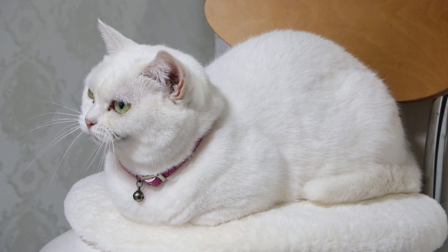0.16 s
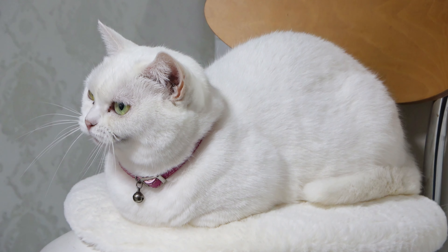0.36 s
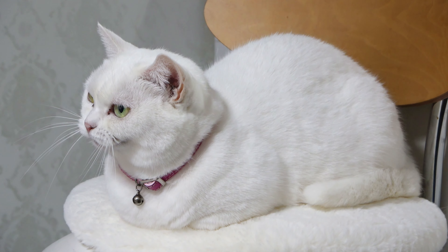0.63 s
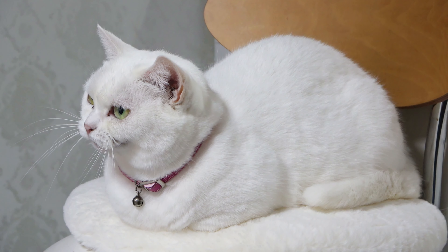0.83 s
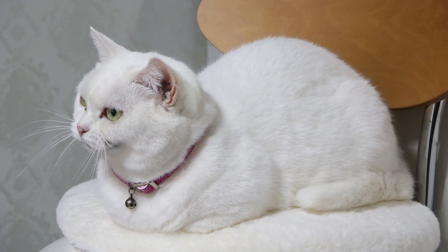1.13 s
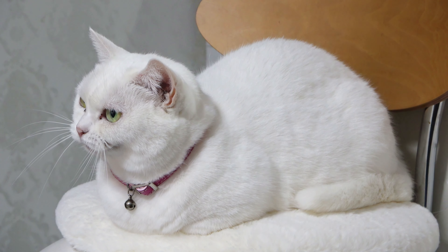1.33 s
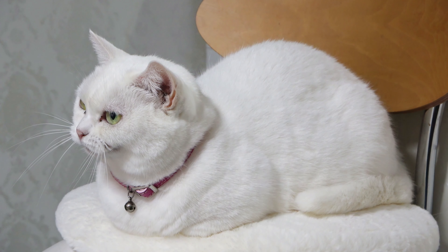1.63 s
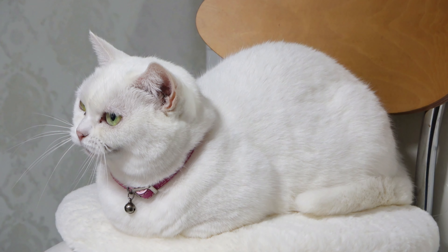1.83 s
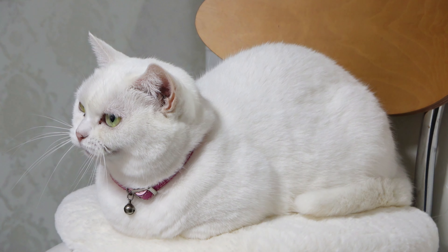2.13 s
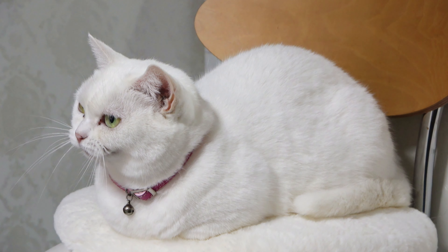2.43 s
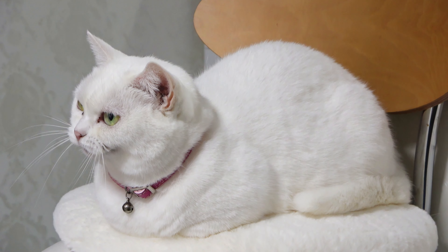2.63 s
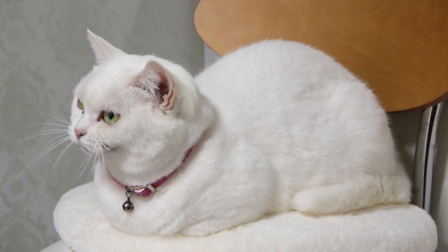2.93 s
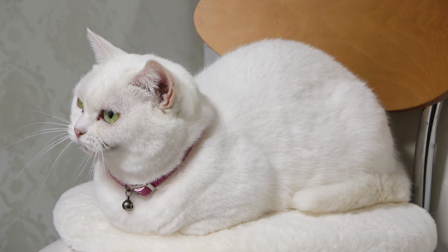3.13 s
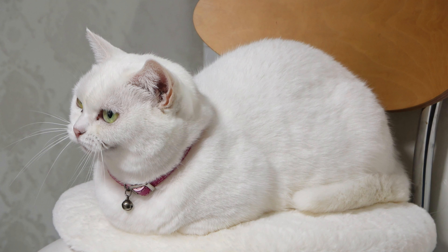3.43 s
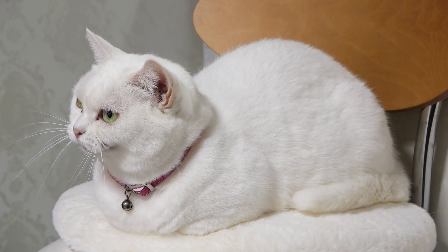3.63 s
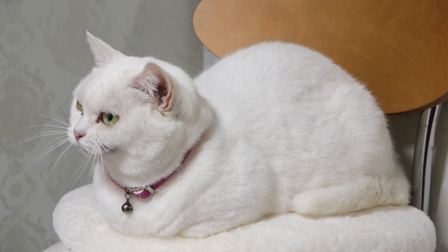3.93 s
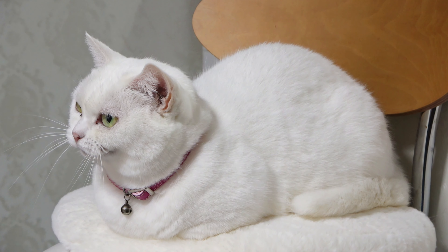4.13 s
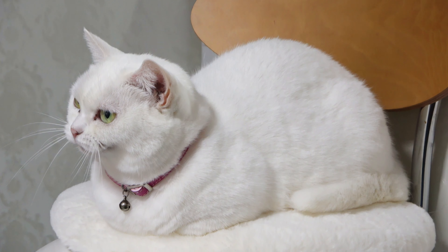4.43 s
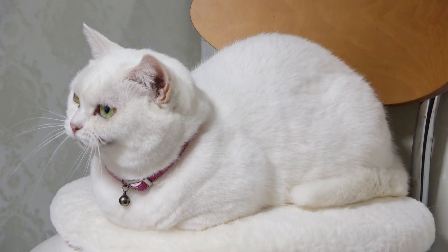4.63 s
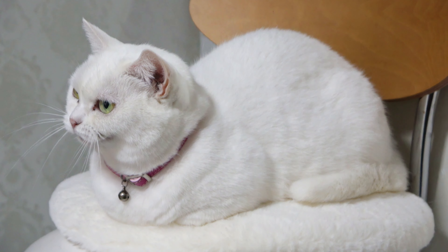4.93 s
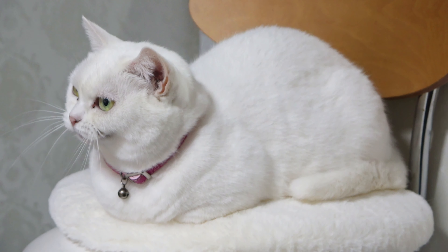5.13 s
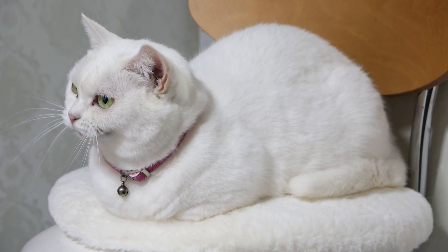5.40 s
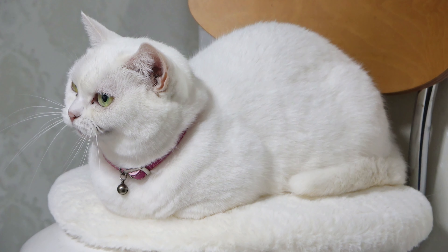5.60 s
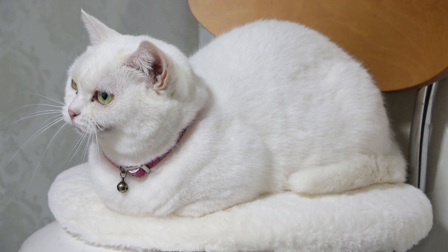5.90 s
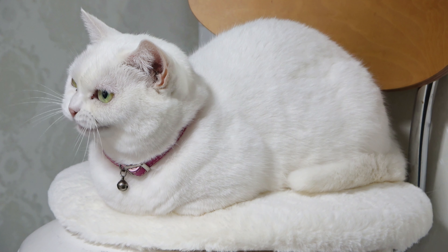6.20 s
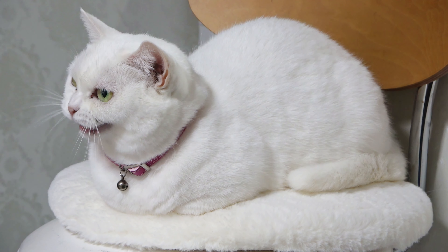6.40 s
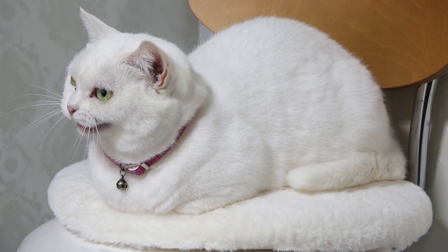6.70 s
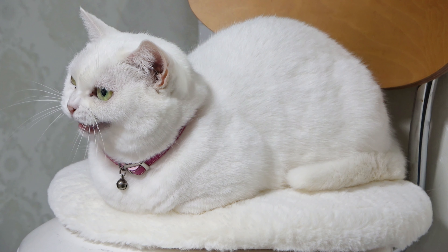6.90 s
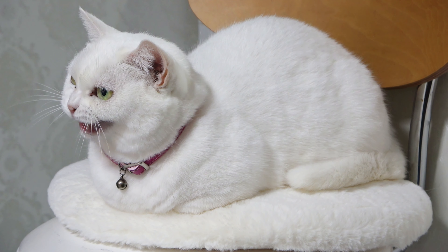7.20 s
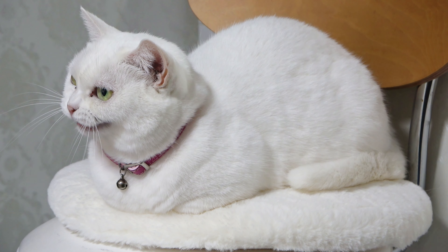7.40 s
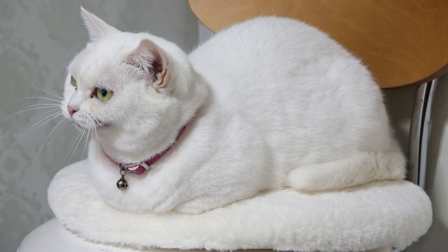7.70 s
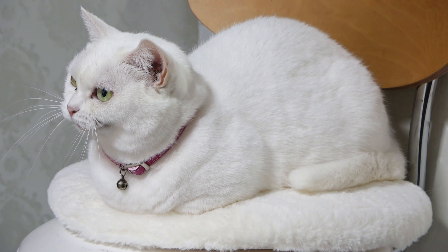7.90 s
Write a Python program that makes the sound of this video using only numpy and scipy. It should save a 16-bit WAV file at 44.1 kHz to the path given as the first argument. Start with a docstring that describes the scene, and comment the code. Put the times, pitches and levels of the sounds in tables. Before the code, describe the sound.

A close microphone in a small quiet room at home picks up steady low hum, soft hiss and a deep floor sway. Someone nearby moves about: muffled boards thump, cloth rustles briefly, and small hollow knocks join in, busiest in the middle. The thumps thin out, then a cat chatters nearby with crisp jaw clicks and two very short rough mews, more clicks following irregularly. One faint thump ends it.

```python
"""Throughout, the hum of the house, microphone hiss and a thin high whine lie under a low floor sway.
From the start someone moves about nearby: thumps ring the boards' modes, a few bursts of noise rustle,
then hollow knocks join in, each a noisy crack and a set of ringing modes.
Late on, a cat chatters: jaw snaps (short clicks with a mouth ring), then two short rough mews, each with a
throat pop at its start (fold pulses and breath through resonances), then snaps; a faint thump ends it."""
import sys
import numpy as np
from scipy import signal
from scipy.io import wavfile
from scipy.ndimage import uniform_filter1d

SR = 44100
rng = np.random.default_rng(int(sys.argv[2]) if len(sys.argv) > 2 else 0)


def inscribe(sig):
    """Save sig as 16-bit PCM at rate SR to the path in sys.argv[1].

    A 1-D sig is mono; a 2-D sig holds one channel per row.
    Samples are clipped to [-1, 1] before scaling.
    """
    pcm = np.round(np.clip(np.atleast_2d(sig).T, -1, 1) * 32767)
    wavfile.write(sys.argv[1], SR, pcm.astype(np.int16))


N = 355093  # length in samples

# Broad colour of the steady bed. Each row: frequency in Hz, relative level in dB.
HUM_COLOUR = [(12, -37), (20, 8), (70, -4), (106, -3), (202, -10.5), (290, -9), (315, -16), (453, -15),
              (492, -20), (747, -18.5), (2150, -28), (2690, -28), (3090, -28), (15600, -33.5)]
# Resonances of the hum. Each row: centre in Hz, width in Hz, boost in dB.
HUM_RESONANCES = [(117, 8.2, 9), (283.9, 15.6, 10), (337, 98, 5), (414, 30, 6), (740, 343, 8),
                  (975, 29, 10.5), (1303, 346, 6), (1793, 400, 2.5), (2725, 640, 5.5)]
# Swells of the floor's sway. Each row: crest in seconds, rms level in dB, sway frequency in Hz, t60 in seconds.
SWAY_LURCHES = [(.02, -32.5, 32.5, 2.1), (.33, -27.5, 31, 0.27), (.545, -19, 29, 0.53),
                (.76, -34, 29, 1.06), (1.09, -26, 32, 1.2), (1.28, -30, 32, 0.95), (1.53, -28, 25.4, 0.44),
                (1.64, -24.5, 26, 0.29), (1.765, -26.5, 27, 1.14), (2.075, -28, 27, 0.75),
                (2.385, -18.5, 24, .5), (2.495, -18, 24.3, .3), (2.599, -22, 24, 0.47),
                (2.81, -27.5, 28, 0.59), (2.94, -21.5, 19.4, 0.64), (3.07, -27.5, 26, 0.92),
                (3.5, -37, 26.5, 0.92), (3.65, -30, 34, 0.56), (3.799, -23, 26.5, .5),
                (3.875, -13, 20, 0.54), (4.01, -16, 21, 0.37), (4.095, -19.5, 26, .3),
                (4.185, -25.5, 26, 0.58), (4.35, -21, 29, .4), (4.51, -16, 20.6, 0.4),
                (4.77, -29, 31, 2.53), (4.98, -20.5, 25, 0.53), (5.04, -16.5, 19.5, 0.31),
                (5.22, -32.5, 26.5, 0.58), (5.38, -28, 25, 0.62), (5.66, -31, 25, 1.1), (5.9, -31, 30, .9),
                (6.04, -33, 31, 0.57), (6.39, -31.5, 26, 0.22), (6.5, -20.5, 23.5, 0.35),
                (6.585, -27.5, 23.7, 0.44), (6.69, -26, 22.5, 0.3), (6.809, -31, 28, 1.6),
                (7.42, -44.5, 40, .8), (7.7, -32.5, 28, 0.31)]
# Ringing modes of the floorboards, low to high. Each row: frequency in Hz, relative level in dB, t60 in seconds.
FLOOR_MODES = [(46.2, -2, 0.33), (54.9, 3.5, 0.28), (70.16, -4.5, 0.75), (77, -9.5, 0.47), (95.2, 0, 0.32),
               (113.6, 1, 0.73), (139.4, -15.5, 0.45), (160, -2.5, 0.1), (179.4, -7.5, 0.48),
               (227.7, 2.5, 0.21), (248.2, -5.5, 0.24), (283.9, -1.5, 0.49), (322, -15, 0.051)]
# Thumps on the floor. Each row: start in seconds, peak of the high modes in dB (before damping), peak of the
# low modes in dB, peak of the middle modes in dB, favoured high mode in Hz, factor on the ring time.
FLOOR_THUMPS = [(0.302, -24.5, -27.5, -32, 180.8, 0.87), (0.509, -36.5, -17.5, -26, 190, 0.86),
                (0.81, -33, -31.5, -32, 180, 0.77), (1.001, -23, -27, -30, 213, 0.97),
                (1.173, -40, -42, -36.5, 256, 0.93), (1.325, -41, -44, -56, 285, 1),
                (1.582, -28, -36, -39, 273, 0.4), (1.637, -35, -41, -32.5, 168.2, 0.6),
                (1.706, -29.5, -25, -48, 287, 0.9), (1.933, -38, -46, -57, 232, 0.63),
                (1.965, -41, -52.5, -37.5, 281, 0.72), (2.045, -34, -48, -55, 227.5, 0.76),
                (2.213, -39, -55, -47, 280, 1), (2.345, -29.5, -16, -26.5, 176.8, 0.94),
                (2.436, -20, -37, -20.5, 179, 1), (2.512, -21, -34, -21.5, 263, 0.64),
                (2.563, -22, -21.5, -26, 226, 0.62), (2.871, -23.5, -23, -47, 227, 0.58),
                (3.628, -31.5, -26.5, -37.5, 233, 0.79), (3.787, -21.5, -33, -49, 243, 0.7),
                (3.817, -27, -14, -27.5, 204.8, 0.78), (3.896, -28.5, -26, -43, 182, 1),
                (3.98, -33, -26, -46, 272, 0.9), (4.048, -24, -27, -28, 228, 0.74),
                (4.103, -32.5, -20.5, -35, 240.6, 0.89), (4.185, -42, -33, -32.5, 164.8, 0.82),
                (4.228, -30, -23, -50, 166, 0.99), (4.317, -30.5, -35, -40.5, 167, 1),
                (4.443, -33, -19.5, -37, 226, 0.73), (4.493, -31, -33, -40, 218.3, 0.63),
                (4.657, -25.5, -25.5, -41.5, 227, 1), (4.706, -32, -30.5, -48, 215, 0.48),
                (4.754, -27.5, -49, -47, 230, 0.52), (4.818, -28.5, -32, -50, 222.5, 0.56),
                (4.854, -30, -45, -52, 221.8, 0.95), (4.89, -30, -28, -37, 229, 0.71),
                (4.959, -34, -25, -48, 204.6, 0.61), (5.033, -35.5, -27.5, -36.5, 291, 0.64),
                (5.233, -35.5, -50, -59, 290, 0.87), (5.319, -38.5, -32, -50, 269.3, 0.73),
                (5.364, -36.5, -46, -43, 167.4, 0.99), (5.601, -34.5, -44, -44, 270, 1),
                (6.204, -55, -54, -54, 280.2, 0.9), (6.45, -33, -29, -48, 291, 1),
                (6.657, -37, -42, -53, 300, 0.66), (6.699, -41, -48, -40, 168.5, 0.48),
                (7.801, -38, -46, -42, 178, 1)]
# Rustles of cloth. Each row: start in seconds, level in dB before the fades, centre in Hz, width in Hz
# (of each of two passes), t60 in seconds.
CLOTH_RUSTLES = [(0.54, -40, 5500, 1800, 0.12), (1.362, -45.5, 7550, 3010, 0.099),
                 (2.345, -44, 2700, 1500, .03), (2.435, -46.5, 3512, 4040, 0.36),
                 (2.512, -34, 3380, 1500, 0.016), (2.5107, -33, 6000, 2500, 0.015),
                 (2.518, -42, 3870, 3500, 0.17), (3.809, -49, 2980, 2160, .1),
                 (4.749, -56, 3220, 1500, .02), (4.96, -53, 5460, 1510, 0.18), (5.33, -53, 5980, 3000, .2),
                 (6.812, -44, 5000, 1970, 0.071), (7.255, -51, 4500, 2990, .2)]
# Ringing modes of the hollow things. Each row: frequency in Hz, relative level in dB, t60 in seconds.
HOLLOW_MODES = [(700, -9, 0.14), (728.6, 3.5, 0.1), (833, -3, 0.048), (942, 0, 0.037), (1037, 3, 0.021),
                (1260, -8.5, 0.054), (1426, -22, 0.1), (2080, -11.5, 0.02)]
# Hollow knocks. Each row: start in seconds, peak of the ring in dB (before damping), favoured mode in Hz,
# crack level against that peak in dB (before its fades).
HOLLOW_KNOCKS = [(2.345, -38.5, 733, -8), (2.437, -38, 751, -14), (2.471, -37, 746, -18),
                 (2.512, -31, 740, -16), (2.563, -34, 694, -10), (3.785, -24, 732, -14.5),
                 (3.809, -35, 740, -10.5), (4.749, -21.5, 729, -17), (4.8655, -30.5, 733, -26)]
# Reflections off near surfaces. Each row: delay in seconds, level in dB before each room's own offset.
NEAR_ECHOES = [(.0017, -15), (.0065, -8), (.008, -30), (0.0147, -11.5)]
# Steady throat resonances. Each row: centre in Hz, width in Hz (of each of two passes), level in dB.
THROAT_RESONANCES = [(1180, 350, 0), (3600, 900, -13), (5500, 2000, -24)]
# One table a mew, its points joined by straight lines. Each row: time in seconds, level in dB, pitch in Hz,
# roughness from 0 to 1, mouth resonance in Hz.
MEW_CURVES = [
    [(6.344, -55, 680, .5, 2100), (6.348, -45, 630, 0.48, 2000), (6.354, -46, 577, 0.37, 1760),
     (6.362, -42, 570, 0.6, 2290), (6.376, -45, 570, 0.4, 1900), (6.39, -53, 567, 0.88, 2620),
     (6.403, -58, 560, 0.7, 2800)],
    [(6.565, -60, 692, 0.6, 2410), (6.569, -39, 640, 0.52, 2290), (6.578, -43, 614, 0.3, 1750),
     (6.591, -40, 598, 0.25, 1700), (6.6, -41.5, 597, 0.34, 2870), (6.608, -51, 615, .65, 2740),
     (6.616, -62, 624, 0.42, 2810)],
]
# Clicks of the cat: jaw snaps, and a throat pop at the start of each mew. Each row: time in seconds,
# click peak in dB, click frequency in Hz, cycles from the click's centre to 1/e, start of the mouth's ring
# against the click in dB.
CAT_CLICKS = [(6.2633, -43, 3930, 2.8, -30), (6.304, -35.5, 3300, 0.6, -18), (6.346, -31, 2300, 0.95, -30),
              (6.5225, -32.5, 2776, 0.98, -17), (6.5658, -33, 2260, 1.4, -30),
              (6.596, -29, 2960, 0.47, -13), (6.8092, -23.5, 3540, 0.58, -21),
              (6.8687, -27, 2997, 0.52, -30), (7.1098, -33.5, 3200, 0.54, -17),
              (7.181, -27.5, 3180, 0.52, -31), (7.2514, -28.5, 3540, 0.53, -21)]

HUM_DB = -42.5  # rms of the hum and hiss
WHINE_HZ, WHINE_DB = 15734, -82  # rms of a thin steady tone at the top
LURCH_RISE_S = .035  # swell to each crest
STILL_DB, STILL_HZ = -56, 29.29  # the faint sway that never stops
CRACK_HZ, CRACK_WIDTH_HZ, CRACK_T60_S = 1400, 1270, 0.037
EDGE_HZ = 15775  # top of the band


def gain_of(db):
    """Decibels to amplitude."""
    return 10 ** (np.asarray(db) / 20)


def evened(x):
    """Scales to rms 1."""
    return x / np.sqrt(np.mean(x ** 2) + 1e-20)


def add(mix, start_s, sound):
    """Mixes a sound in at its start time, cut at the end of the mix."""
    part = mix[round(start_s * SR):][:len(sound)]
    part += sound[:len(part)]


def resonate(x, hz, width):
    """A resonance of gain 1: shifts hz down to zero, smooths with one pole, and shifts back."""
    turn = np.exp(2j * np.pi * np.cumsum(hz * np.ones(len(x))) / SR)
    pole = np.exp(-np.pi * width / SR)
    smoothed = signal.lfilter([1 - pole], [1, -pole], x / turn)
    return 2 * (turn * smoothed).real


def resonate_twice(x, hz, width):
    """Two passes of one resonance, for steeper skirts."""
    return resonate(resonate(x, hz, width), hz, width)


def ring(modes, rise_s, favoured_hz=1, slope_db=0, lasting=1, quicker=0):
    """One blow on decaying modes, peak 1: levels fall by slope_db per octave off the favoured one."""
    t = np.arange(SR // 2) / SR
    out = np.zeros(len(t))
    for (hz, db, t60), (strength, phase) in zip(modes, rng.random((len(modes), 2))):
        octaves_off = abs(np.log2(hz / favoured_hz))
        start_db = db - slope_db * octaves_off + 6.8 * (strength - .5)  # no two blows alike
        rise_rate = (hz / modes[0][0]) ** quicker / rise_s  # higher modes rise sooner if quicker > 0
        rise = (1 - np.exp(-t * rise_rate)) ** 2
        out += gain_of(start_db - 60 * t / (t60 * lasting)) * rise * np.sin(2 * np.pi * (hz * t + 0.5 * phase))
    return out / abs(out).max()


def damping(after_s, drop_db):
    """Free ringing at first, then a smooth drop as the struck thing is held."""
    t = np.arange(SR // 2) / SR
    held = 1 / (1 + np.exp(-(t - after_s) / (0.06 * after_s)))
    return gain_of(-drop_db * held)


def room(x, t60, wet_db, echo_db, hz, width):
    """Adds early echoes and a short tail of sparse random-sign taps, coloured by one resonance."""
    taps = np.zeros(SR // 4)
    at = np.arange(300, len(taps) - 20, 20)
    spots = at + rng.integers(0, 20, len(at))
    taps[spots] = rng.choice([-1., 1.], len(at)) * gain_of(-60 * at / SR / t60)
    taps *= gain_of(wet_db) / np.linalg.norm(taps)
    for delay_s, db in NEAR_ECHOES:
        taps[round(delay_s * SR)] += gain_of(db + echo_db)
    return x + signal.oaconvolve(x, resonate_twice(taps, hz, width))[:N]


def hum():
    """House hum in broad resonances and microphone hiss, as slightly patchy shaped noise, plus the whine."""
    frames, hz = N // 512 + 5, np.fft.rfftfreq(2048, 1 / SR)
    real, imaginary, patches = rng.standard_normal((frames, 1025, 3)).T
    patches = evened(uniform_filter1d(uniform_filter1d(patches, 10, 0), 8, 1))
    swell = evened(uniform_filter1d(rng.standard_normal(frames), 9))  # the whole bed wavers a little
    colour_hz, colour_db = np.transpose(HUM_COLOUR)
    shape_db = np.interp(np.log(hz + 1), np.log(colour_hz + 1), colour_db)
    for centre, width, db in HUM_RESONANCES:
        shape_db += db / (1 + (2 * (hz - centre) / width) ** 2) ** 2
    patchy_db = 1.26 / (1 + hz / 15000.0)  # more patchy low down than in the hiss
    level_db = shape_db[:, None] + patchy_db[:, None] * patches + .35 * swell
    spectrum = (real + 1j * imaginary) * gain_of(level_db)
    noise = evened(signal.istft(spectrum, nperseg=2048, noverlap=1536)[1][:N])
    whine = np.sqrt(2) * gain_of(WHINE_DB) * np.sin(2 * np.pi * WHINE_HZ * np.arange(N) / SR)
    return gain_of(HUM_DB) * noise + whine


def sway():
    """A low wobbling tone: lurches add up in power, and the stronger ones weigh most on its frequency."""
    t = np.arange(0, N + 64, 64) / SR
    crest_s, level_db, hz, t60 = np.transpose(SWAY_LURCHES)[:, :, None]
    early, late = np.minimum(t - crest_s, 0), np.maximum(t - crest_s, 0)
    swell = np.exp(-2 * (early / LURCH_RISE_S) ** 2)
    power = gain_of(level_db - 60 * late / t60) ** 2 * swell
    still_power = gain_of(STILL_DB) ** 2
    total = power.sum(0) + still_power
    speed_hz = ((power * hz).sum(0) + still_power * STILL_HZ) / total
    level, speed_hz = (np.interp(np.arange(N) / SR, t, c) for c in (np.sqrt(2 * total), speed_hz))
    wobble = evened(uniform_filter1d(uniform_filter1d(rng.standard_normal(N), 900), 900))
    angle = 2 * np.pi * np.cumsum(speed_hz * (1 + 0.122 * wobble)) / SR
    return level * (np.sin(angle) + 0.14 * np.sin(2 * angle + 1))


def floor():
    """The sway, and thumps that ring the boards' low, middle and high modes, the high ones soon damped."""
    out = sway()
    lows, middles, highs = FLOOR_MODES[:4], FLOOR_MODES[4:7], FLOOR_MODES[7:]
    held = damping(0.0098, 4.2)
    for s, high_db, low_db, middle_db, high_hz, lasting in FLOOR_THUMPS:
        low = gain_of(low_db) * ring(lows, 0.0061, lasting=lasting)
        middle = gain_of(middle_db) * ring(middles, 0.0043, lasting=lasting)
        high = gain_of(high_db) * held * ring(highs, 0.0044, high_hz, slope_db=12.0, lasting=lasting)
        add(out, s, low + middle + high)
    return out


def rustles():
    """Brief rustles of cloth: grainy noise through a resonance, rising fast and dying away."""
    out, t = np.zeros(N), np.arange(SR // 4) / SR
    for s, level_db, hz, width, t60 in CLOTH_RUSTLES:
        grains = rng.standard_normal(len(t)) * rng.exponential(1, len(t)) ** 0.33
        noise = evened(resonate_twice(grains, hz, width))
        rise = 1 - np.exp(-t / (0.068 * t60))
        add(out, s, noise * gain_of(level_db - 60 * t / t60) * rise)
    return out


def knocks():
    """Small hollow things struck: a short noisy crack over the soon-damped ring of their modes."""
    out, held, t = np.zeros(N), damping(.0125, 17), np.arange(SR // 10) / SR
    for s, peak_db, hz, crack_db in HOLLOW_KNOCKS:
        add(out, s, gain_of(peak_db) * held * ring(HOLLOW_MODES, 0.002, hz, slope_db=5.0, quicker=4.6))
        crack = evened(resonate_twice(rng.standard_normal(len(t)), CRACK_HZ, CRACK_WIDTH_HZ))
        rise = np.minimum(t / 0.0018, 1)
        add(out, s, gain_of(peak_db + crack_db - 60 * t / CRACK_T60_S) * rise * crack)
    return out


def mew(rows):
    """Vocal fold pulses and puffs of air in step with them pass a throat and a moving mouth."""
    s, *columns = np.transpose(rows)
    t = np.arange(s[0], s[-1], 1 / SR)
    level_db, hz, rough, mouth_hz = (np.interp(t, s, c) for c in columns)
    rough = np.clip(rough, 0, 1)
    jitter = .33 * uniform_filter1d(rng.standard_normal(len(hz)), 80)
    turns = np.cumsum(hz * (1 + jitter)) / SR
    folds = evened(sum(np.cos(2 * np.pi * k * turns) for k in range(1, 12)))
    puffs = evened((.3 + np.exp(-(turns % 1) / 0.27)) * rng.standard_normal(len(hz)))
    puffs = puffs - resonate(puffs, 1100.0, 1093.0)  # thin the air around 1100 Hz
    drive = (1 - rough) * folds + rough * puffs
    voice = gain_of(-3.0) * resonate(resonate(drive, mouth_hz, 1100.0), mouth_hz, 1040.0)
    for throat_hz, width, db in THROAT_RESONANCES:
        voice -= gain_of(db) * resonate_twice(drive, throat_hz, width)
    return s[0], gain_of(level_db) * evened(voice)


def cat():
    """Mews, throat pops and jaw snaps: each pop or snap is a brief click, and the mouth rings after it."""
    out, t = np.zeros(N), np.arange(-40, 600) / SR
    for rows in MEW_CURVES:
        add(out, *mew(rows))
    for s, peak_db, hz, cycles, ring_db in CAT_CLICKS:
        click = -np.cos(2 * np.pi * hz * t) * np.exp(-(t * hz / cycles) ** 2)
        after = np.sin(2 * np.pi * 2173.0 * t) * gain_of(ring_db - 60 * t / 0.017) * (t > 0)
        add(out, s, gain_of(peak_db) * (click + after))
    return out


def scene():
    """All sources together, the cat and the knocks each in a room of their own colour."""
    near = room(cat(), t60=.17, wet_db=-3, echo_db=5, hz=3000, width=900)
    far = room(knocks(), t60=0.24, wet_db=-10.5, echo_db=-20.0, hz=1010.0, width=1600.0)
    return (near + far + rustles() + floor() + hum())[None]


def record(dry):
    """The band limit: a steep low-pass at the top edge."""
    low_pass = signal.firwin(2047, EDGE_HZ, window=("kaiser", 9), fs=SR)
    return signal.oaconvolve(dry, low_pass[None], "same")


dry = scene()
out = record(dry)
inscribe(out)
```